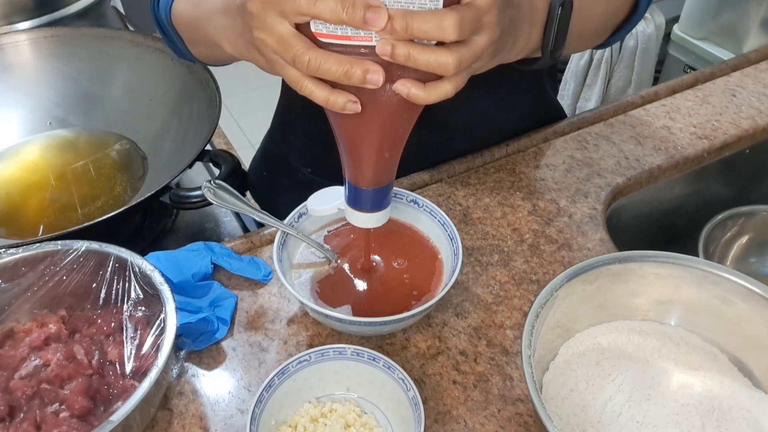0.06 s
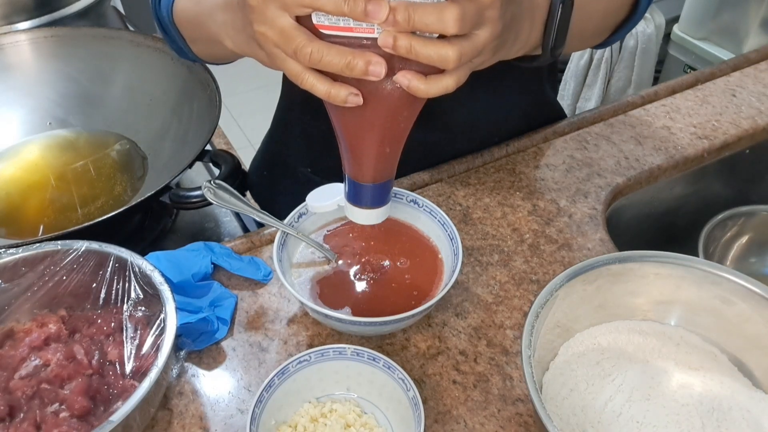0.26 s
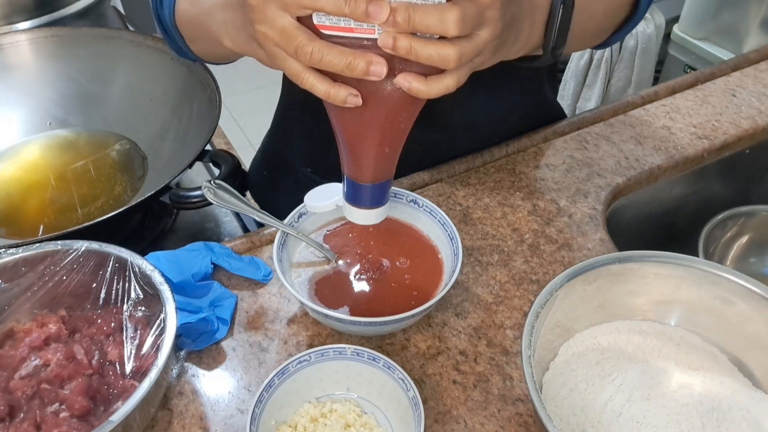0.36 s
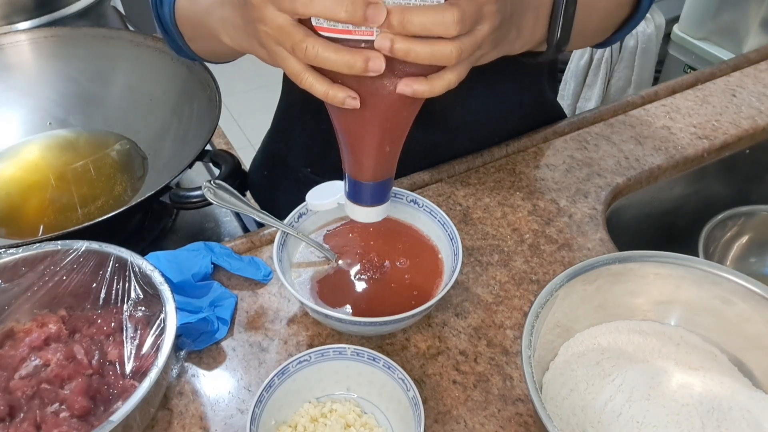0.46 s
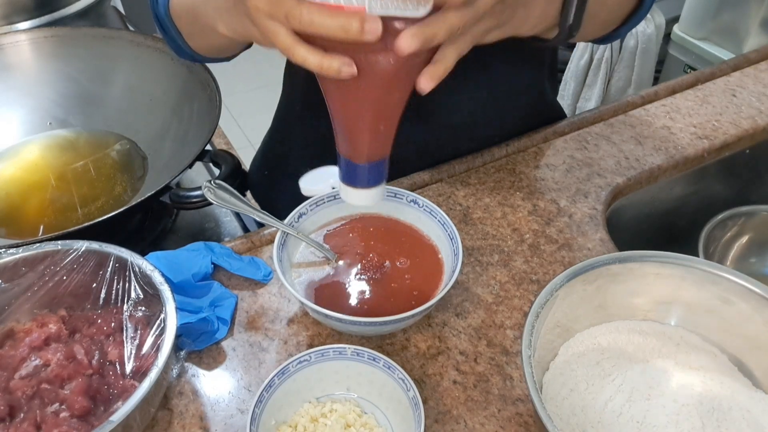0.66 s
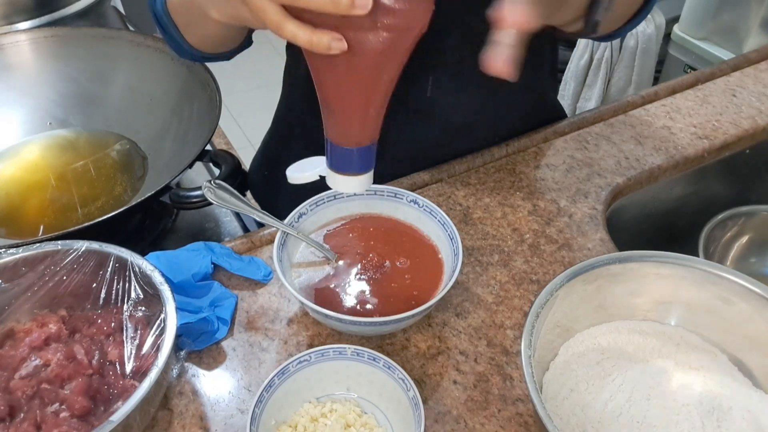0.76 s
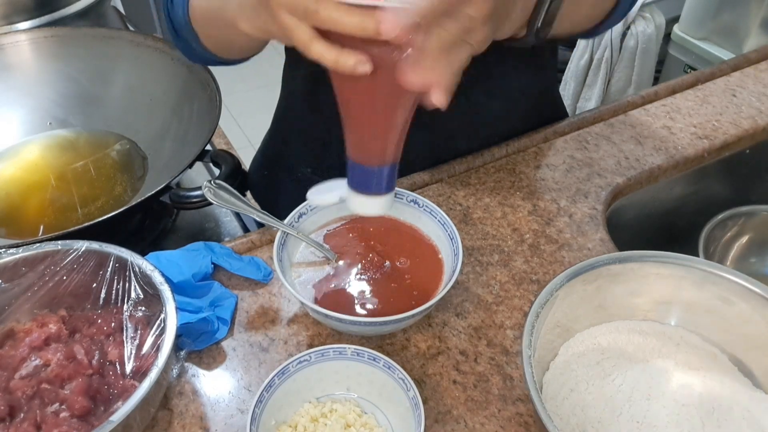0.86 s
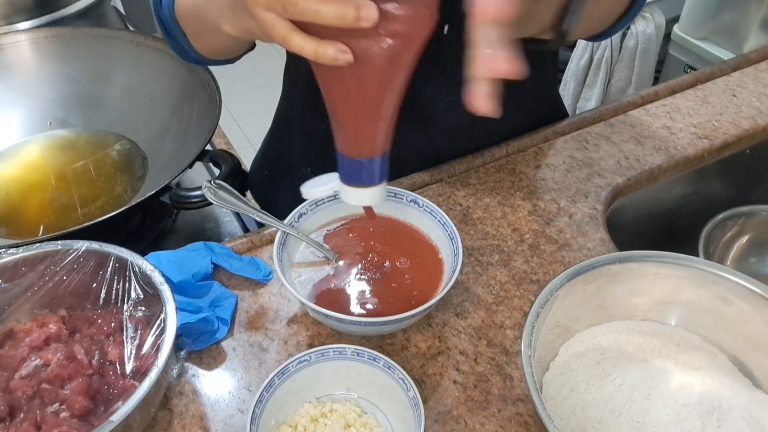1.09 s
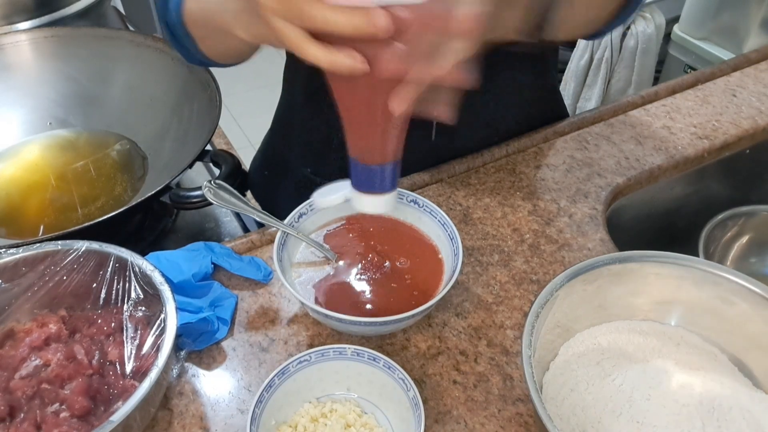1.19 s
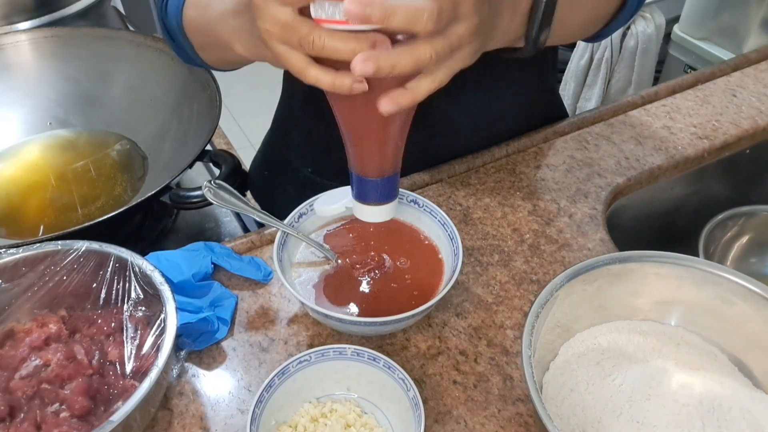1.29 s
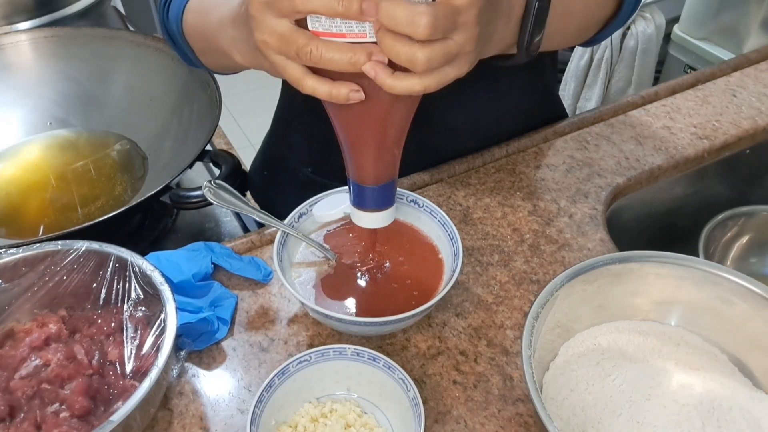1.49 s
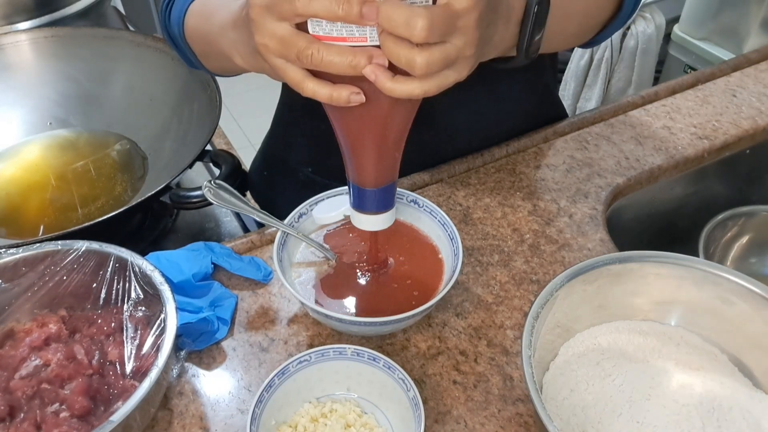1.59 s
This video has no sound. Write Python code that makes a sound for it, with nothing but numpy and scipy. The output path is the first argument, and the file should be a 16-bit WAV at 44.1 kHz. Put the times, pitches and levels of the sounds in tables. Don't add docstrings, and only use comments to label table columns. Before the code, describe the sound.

Squeezed sauce bottle spits a rude burst of air and sauce, wheezes in, then a palm slap

```python
import sys
import numpy as np
from scipy import signal
from scipy.fft import rfft, irfft
from scipy.io import wavfile
from scipy.ndimage import uniform_filter1d, minimum_filter1d

SR = 44100
rng = np.random.default_rng(int(sys.argv[2]) if len(sys.argv) > 2 else 0)


def invert_db(x):
    u = np.asarray(x, float) / 20
    return 10 ** u


def to_wav(s):
    ch = np.atleast_2d(s).T
    pcm = np.round(np.clip(ch, -1, 1) * 32767)
    wavfile.write(sys.argv[1], SR, pcm.astype(np.int16))


N = 72765
T = np.arange(N) / SR

# (time [s], level [dB], contact [ms], spit level [dB], bubble pitch [Hz])
POPS = [(0.2232, -5.5, 0.53, -54, 400), (0.2345, 1.5, 0.41, -15, 470), (0.2443, -0.5, 0.43, 0.5, 700),
        (0.2489, -9.5, 0.2, 0, 350), (0.2535, -2, 0.26, -13, 600), (0.2592, -5, 0.49, -4, 625),
        (.264, -13.5, 0.25, 0, 500), (0.2707, 6, 0.38, 7.5, 427), (.2782, -3.5, 1.15, -22, 527),
        (0.2838, -1, 0.56, -13, 560), (0.2886, -1, 0.99, -24, 450), (0.2926, -3.5, 1.4, -23, 400),
        (0.2976, 4.5, 1.1, -6, 350), (0.3099, 4.5, 1.8, -3.5, 350), (0.319, -10.5, 1.1, -5, 327),
        (0.328, 6, 1.28, -15, 350), (0.345, -9.5, 2.5, -34, 300), (0.3526, -1, 2.06, -20, 341.8),
        (0.3597, -4, 1.2, -23.5, 400), (0.365, -3.5, 1.68, -20, 350), (0.383, -5, 2.9, -11.5, 280),
        (.391, -8, 1.6, -17, 300), (0.396, -5, 1.4, -6, 382), (.411, -14.5, 2.2, -22, 300),
        (0.484, -11.5, 1.2, -35, 350), (0.5042, -19.5, 1.8, -29, 600), (.5100, -8, 0.71, -35, 374),
        (.519, -15.5, 0.54, -37, 350), (0.529, -7, 1.3, -25, 300), (.533, -17, 1.32, -28, 300),
        (0.5395, -3, 0.62, -24, 280), (0.5435, -6.5, 0.64, -31, 300), (0.548, -14, 2.05, -41, 220),
        (0.559, -24, 1.13, -16, 231), (0.569, -20, 1.2, -16, 200), (0.576, -18.5, 2.5, -27, 210)]
# (time [s], level [dB])
SQUEEZE = [
    (.219, -58.5),
    (.224, -46),
    (.25, -37),
    (.28, -33.5),
    (.31, -46),
    (.35, -47),
    (.37, -49.5),
    (.41, -57.5),
    (.49, -71),
]
# (time [s], level [dB])
SUCK = [
    (.478, -91.5),
    (.487, -65.5),
    (.52, -55.5),
    (.545, -47),
    (.575, -63),
    (.62, -66),
    (.66, -81),
    (.70, -109),
]
# (pitch [Hz], t60 [s], level under the slap [dB], level under the knock [dB])
WORKTOP = [(42, 0.15, -18.5, -23.5), (66.1, .2, -6.5, -7), (105.16, .26, -2.5, -1.5),
           (147.7, 0.094, -5.5, -5.5)]
SUCKING = T >= SUCK[0][0]
BOTTLE_DB = -15.5
PATCH_S = 0.0028


def level(x, db):
    return x * invert_db(db) / np.sqrt(np.mean(x ** 2))


def band(x, hz, width):
    return signal.lfilter(*signal.iirpeak(hz, hz / width, fs=SR), x)


def coloured(points):
    p = np.array(points)
    f = np.fft.rfftfreq(N, 1 / SR) + 1
    gain = invert_db(np.interp(np.log(f), np.log(p[:, 0]), p[:, 1]))
    return level(irfft(rfft(rng.standard_normal(N)) * gain, N), 0)


def curve(points):
    p = np.array(points)
    return invert_db(np.interp(T, p[:, 0], p[:, 1], left=-150, right=-150))


def walk(hold_s):
    k = int(hold_s * SR)
    smooth = uniform_filter1d(rng.standard_normal(N), size=k)
    return level(uniform_filter1d(smooth, size=k), 0)


def pushes(times, dbs, contact_ms):
    out, k = np.zeros(N), np.arange(512)
    for s, db, ms in zip(times, dbs, contact_ms):
        u = np.clip((k - s * SR % 1) / (ms * SR / 1000), 0, 1)
        bump = np.sin(np.pi * u) ** 2 * 2000 / (ms * SR)
        out[int(s * SR):int(s * SR) + len(k)] += invert_db(db) * bump
    return out


def ring(force, hz, db, t60):
    pole = np.exp((2j * np.pi * hz - np.log(1000) / t60) / SR)
    return invert_db(db) * signal.lfilter([1], [1, -pole], force).imag


def drifting(x, hz, t60, wander):
    pitch = hz * (1 + wander * walk(0.004))
    spin = np.exp(2j * np.pi * np.cumsum(pitch) / SR)
    decay = np.exp(-np.log(1000) / t60 / SR)
    return (spin * signal.lfilter([1], [1, -decay], x / spin)).imag


def valve_slips():
    per_s, slip_ms, slip_db = 460, 0.41, 20
    chance = rng.random((2, N))
    slips = (chance[0] < per_s / SR) * np.log(chance[1] + 1e-9)
    slips = slips * (curve(SQUEEZE) + curve(SUCK)) * invert_db(slip_db)
    return np.convolve(slips, pushes([0], [0], [slip_ms])[:256])[:N]


def bottle_pops():
    # (pitch [Hz], t60 [s], level squeezing [dB], level sucking [dB])
    bottle_modes = [(219, 0.042, -26.5, -7), (260, 0.16, -26, -7), (341.6, .08, 5, -3),
                    (390, 0.11, -3.5, -1), (451.7, 0.056, -0.5, -7.5), (521.3, 0.089, -1, -3),
                    (586.5, 0.073, -5, -22.5), (713.3, 0.074, -3.5, -4.5), (817, 0.09, -11, -13),
                    (912.5, 0.022, -9.5, -23), (1136, 0.07, -4.5, -9.5), (1287, 0.062, -5.5, -10),
                    (1372.5, .07, -9, -9)]
    scatter_db, longest_ring_s, radiate_hz = 5.5, 0.083, 200
    bubble_db, bubble_cycles = 1.5, 10
    pops, slips, out = np.array(POPS), valve_slips(), 0
    for hz, t60, squeeze_db, suck_db in bottle_modes:
        dbs = pops[:, 1] + scatter_db * rng.standard_normal(len(pops))
        force = slips + pushes(pops[:, 0], dbs, pops[:, 2])
        force = force * invert_db(np.where(SUCKING, suck_db, squeeze_db))
        t60 = min(t60, longest_ring_s * max(1, 300 / hz))
        out = out + drifting(force, hz, t60, 0.017)
    for s, db, ms, _, hz in POPS:
        out = out + ring(pushes([s], [db], [ms]), hz, bubble_db, bubble_cycles / hz)
    return invert_db(BOTTLE_DB) * signal.lfilter(*signal.butter(3, radiate_hz, "high", fs=SR), out)


def valve_air():
    # (centre [Hz], width [Hz], level squeezing [dB], level sucking [dB])
    resonances = [(1238, 400, 5.5, 8.5), (2030, 500, -10.5, -25.5), (3380, 620, -1.5, 2.5),
                  (3950, 1700, -6.5, -46), (5606, 1500, -4, -1.5), (6804, 950, -8.5, 1.5),
                  (8788, 800, -14, -15), (10580, 810, -21, -16.5), (12500, 2000, -25.5, -52),
                  (14500, 1600, -28.5, -19)]
    spit_db, spit_s, sputter_db = -40.5, 0.0035, 3
    jet_opens_s, jet_rise_s, jet_shut_db, jet_hz = 0.5215, 0.01, -19.5, 5000
    spit = 0
    for s, _, _, db, _ in POPS:
        spit = spit + invert_db(db + spit_db) * (T >= s) * np.exp(-np.abs(T - s) / spit_s)
    still_shut = np.clip((jet_opens_s + jet_rise_s - T) / jet_rise_s, 0, 1)
    jet = invert_db(jet_shut_db * still_shut)
    outward = curve(SQUEEZE) + spit * ~SUCKING
    inward = curve(SUCK) + spit * SUCKING
    out = 0
    for hz, width, squeeze_db, suck_db in resonances:
        suck_gain = np.where(SUCKING, jet if hz > jet_hz else 1, 1)
        flow = outward * invert_db(squeeze_db) + inward * invert_db(suck_db) * suck_gain
        hiss = rng.standard_normal(N) * flow * invert_db(sputter_db * walk(PATCH_S))
        voice = drifting(band(hiss, hz, width), hz, 2 / width, 0.0084)
        out = out + voice * np.sqrt(width / SR) * 5.74
    return out


def squeaks():
    # (start [s], length [s], centre [Hz])
    puffs = [(.222, .01, 8900), (.243, .014, 3500), (.255, .062, 14000), (.26, .009, 8900),
             (.268, .02, 3500), (.268, .012, 5800), (.279, .01, 8700), (.314, .008, 13500),
             (.353, .007, 7500), (.359, .02, 9100), (.359, .016, 10300), (.362, .015, 14800),
             (.484, .02, 3700), (.503, .009, 1400), (.52, .022, 2020), (.535, .02, 740), (.536, .02, 14600),
             (.548, .04, 2050), (.615, .031, 1450), (.9728, .0033, 7000), (.974, .132, 1620),
             (.978, .06, 560), (1.334, .017, 1500), (1.335, .06, 360), (1.336, .046, 13600),
             (1.34, .05, 3900), (1.345, .045, 6500), (1.35, .08, 2850), (1.354, .025, 1300),
             (.34, .13, 106)]
    # (width [Hz], level [dB])
    puff_sounds = [(600, -57.5), (400, -36), (3300, -61.5), (500, -54.5), (400, -39), (900, -44.5),
                   (300, -54), (4000, -59), (991, -47.5), (600, -43), (500, -46), (900, -59.5),
                   (473, -52.5), (340, -52.5), (150, -38.5), (118.6, -32), (800, -67), (250, -55),
                   (123, -49.5), (3440, -30), (300, -53.5), (130, -38), (2200, -55), (69.5, -30.5),
                   (2500, -66.5), (700, -69.5), (1194, -70), (500, -65.5), (1260, -53.5), (15, -32.5)]
    out = 0
    for (s, length, hz), (width, db) in zip(puffs, puff_sounds):
        u = np.clip((T - s) / length, 0, 1)
        noise = band(band(rng.standard_normal(N), hz, width), hz, width)
        out = out + level(noise, db) * np.sin(np.pi * np.sqrt(u)) ** 2
    return out


def pop_shake():
    pops = np.array(POPS)
    hz, t60, _, _ = WORKTOP[2]
    force = pushes(pops[:, 0], pops[:, 1] - 24.5, pops[:, 2])
    return ring(force * invert_db(1.5 * SUCKING), hz, 0, t60)


def palm_slaps():
    # (time [s], level [dB], rise [s], t60 [s])
    smacks = [
        (0.9694, -22, 0.00835, 0.24),
        (1.338, -59, 0.0024, 0.52),
    ]
    # (frequency [Hz], level [dB per Hz])
    smack_colour = [(410, -22.5), (600, -2.5), (776, -16.5), (968, -6), (1760, -6), (2600, -21),
                    (3150, -12.5), (6420, -12), (15500, -33.5)]
    env = 0
    for s, db, rise, t60 in smacks:
        env = env + invert_db(db - 60 * np.abs(T - s) / t60) * np.clip((T - s) / rise, 0, 1)
    noise, out = coloured(smack_colour), 0
    for hz in 250 * 2 ** np.arange(0, 6, .5):
        sos = signal.butter(2, [hz, hz * np.sqrt(2)], "band", fs=SR, output="sos")
        out = out + signal.sosfilt(sos, noise) * invert_db(.8 * walk(PATCH_S))
    return env * out


def blows():
    # (time [s], level [dB], contact [ms], worktop level [dB])
    hits = np.array([(0.974, -44.5, 3.2, -19.5), (.9810, -11.5, 1.13, -26), (0.9824, -8, 1.83, -11.5),
                     (0.993, -22.5, 2.6, -27), (1, -16, 2.65, -22), (1.026, -30, 1.3, -21.5),
                     (1.0460, -36, 4.1, -27.5), (1.335, -26, 1.95, -31), (1.3394, -12, 4.9, -9),
                     (1.3570, -42, 2.75, -10), (1.379, -42, 2.3, -21)])
    # (pitch [Hz], level [dB], t60 [s])
    wall_modes = [(205.3, 7, 0.13), (243, 9, 0.17), (325.4, 11.5, 0.058), (350, -7, 0.077),
                  (417, -2.5, 0.068), (508, -9, 0.063), (561.6, -7, 0.096), (656, -17, 0.052),
                  (836, -26, .08), (1052, -25.5, 0.065)]
    knock_s, scatter_db = 1.2, 3
    wall, top = 0, 0
    for hz, db, t60 in wall_modes:
        dbs = hits[:, 1] + scatter_db * rng.standard_normal(len(hits))
        wall = wall + ring(pushes(hits[:, 0], dbs, hits[:, 2]), hz, db, t60)
    for hz, t60, slap_db, knock_db in WORKTOP:
        dbs = hits[:, 3] + np.where(hits[:, 0] < knock_s, slap_db, knock_db)
        top = top + ring(pushes(hits[:, 0], dbs, hits[:, 2]), hz, 0, t60)
    return -invert_db(BOTTLE_DB) * wall - top


def kitchen():
    # (frequency [Hz], level [dB per Hz])
    hum_colour = [(30, -1.5), (70, -1), (170, -18.5), (350, -1.5), (700, -22), (1600, -50), (8000, -31),
                  (15500, -52)]
    # (time [s], level [dB])
    hands = [(0, -62), (.2, -66.5), (.5, -49), (.65, -54), (.78, -55), (.9, -66), (1.08, -54), (1.2, -55),
             (1.3, -57), (1.45, -48.5), (1.65, -55)]
    # (frequency [Hz], level [dB per Hz])
    hands_colour = [(20, -20.5), (35, -6.5), (60, 4), (110, -3.5), (170, -18.5), (300, -16), (1100, -29),
                    (1700, -51)]
    clink_hz, clink_width_hz, clink_db, clink_t60_s = 3500, 100, -62, 0.23
    clink = level(band(rng.standard_normal(N), clink_hz, clink_width_hz), clink_db)
    clink = clink * invert_db(-60 * T / clink_t60_s)
    return invert_db(-70.5) * coloured(hum_colour) + curve(hands) * coloured(hands_colour) + clink


def room(x):
    room_db, t60_s, treble_t60_s, long_db, long_t60_s = -15, 0.19, 0.047, -44.5, 1
    t = np.arange(SR) / SR
    noise = rng.standard_normal(SR) * (t > .003)
    low = signal.lfilter(*signal.butter(2, 1500, fs=SR), noise)
    tail = low * (invert_db(-60 * t / t60_s) + invert_db(long_db - 60 * t / long_t60_s))
    tail = tail + (noise - low) * invert_db(-60 * t / treble_t60_s)
    tail = tail / np.sqrt(np.sum(tail ** 2))
    return x + invert_db(room_db) * signal.fftconvolve(x, tail)[:N]


def scene():
    bottle = bottle_pops() + valve_air() + squeaks() + pop_shake()
    hand = palm_slaps() + blows()
    return (room(bottle + hand) + kitchen())[None]


def low_pass(x):
    return signal.sosfilt(signal.butter(12, 16480, fs=SR, output="sos"), x)


def record(dry):
    ceiling, limit_samples = .96, 131
    x = signal.lfilter(*signal.butter(3, 44, "high", fs=SR), dry)
    x = signal.sosfilt(signal.ellip(10, .2, 80, 15800, fs=SR, output="sos"), x)
    gain = ceiling / np.maximum(np.abs(x), ceiling)
    gain = minimum_filter1d(gain, size=2 * limit_samples + 1)
    mix = x * uniform_filter1d(gain, size=limit_samples)
    return low_pass(mix)


dry = scene()
out = record(dry)
to_wav(out)
```